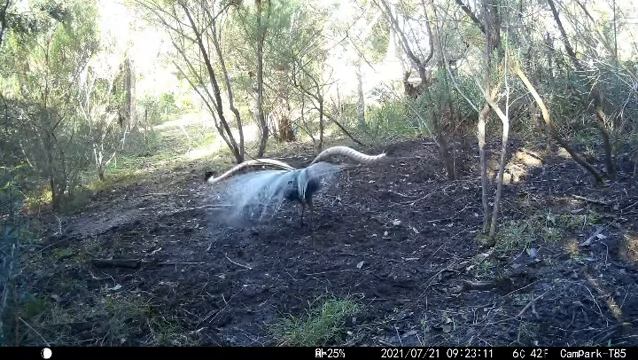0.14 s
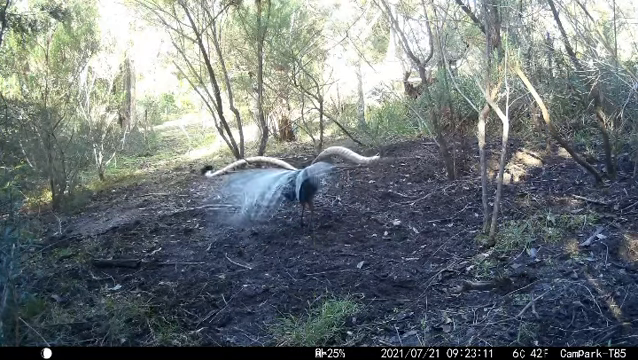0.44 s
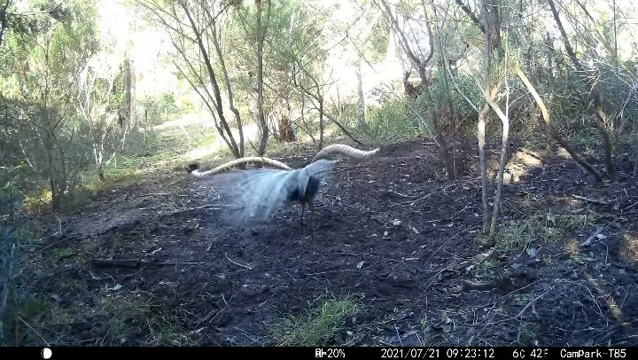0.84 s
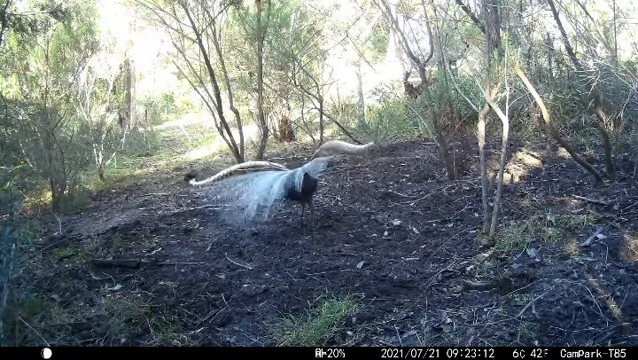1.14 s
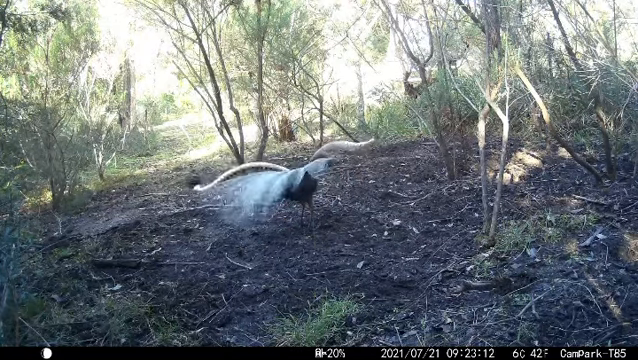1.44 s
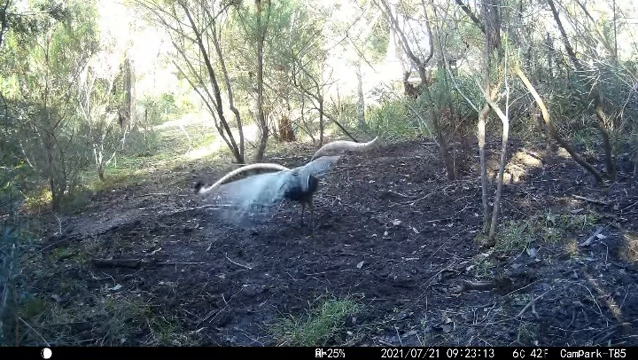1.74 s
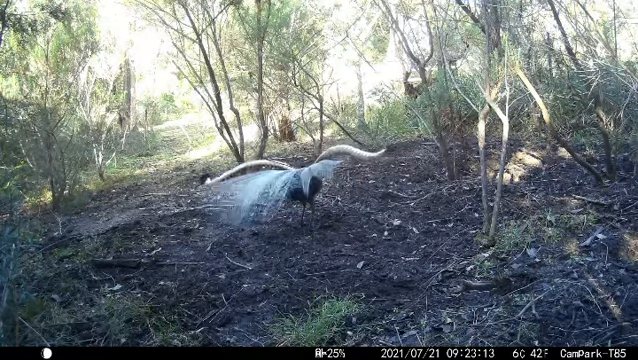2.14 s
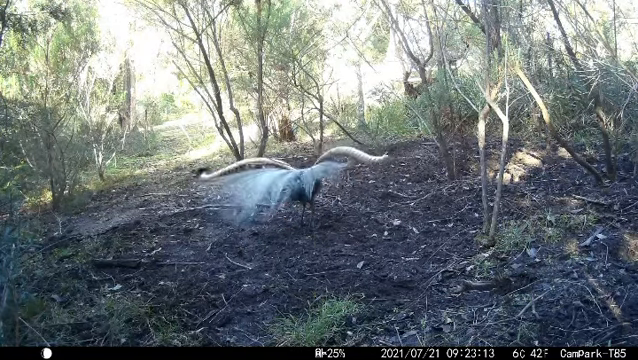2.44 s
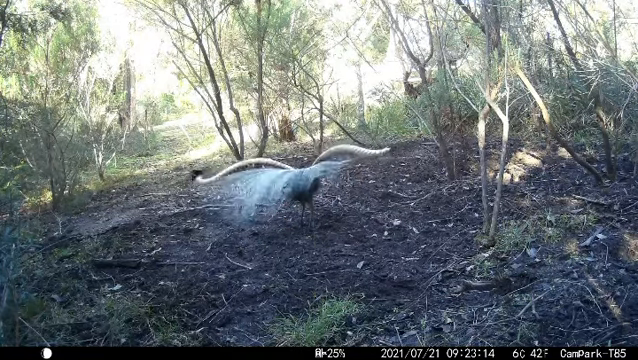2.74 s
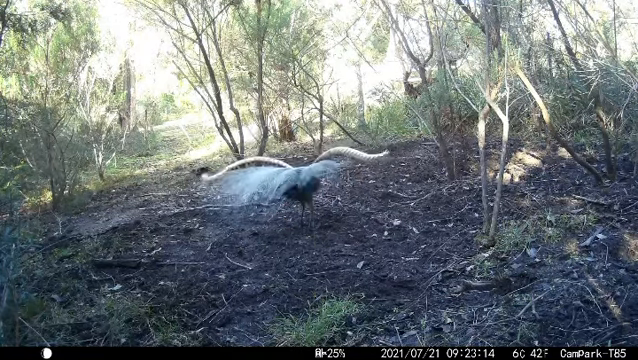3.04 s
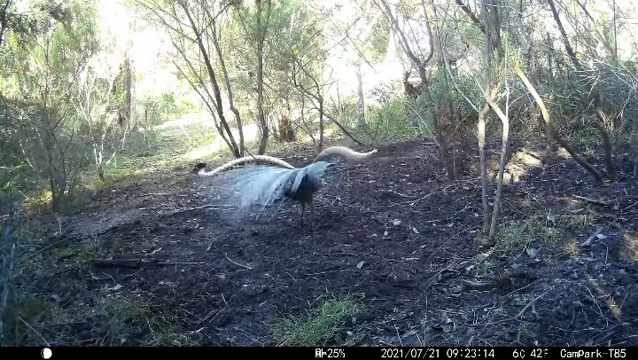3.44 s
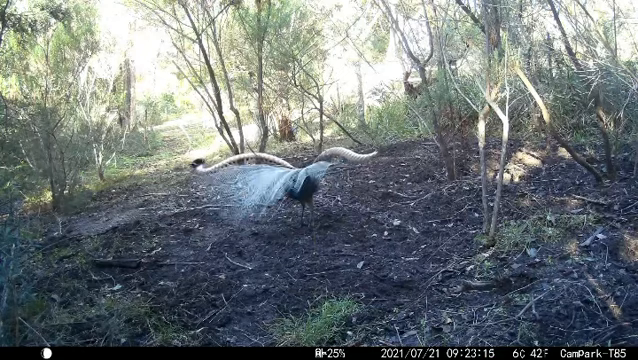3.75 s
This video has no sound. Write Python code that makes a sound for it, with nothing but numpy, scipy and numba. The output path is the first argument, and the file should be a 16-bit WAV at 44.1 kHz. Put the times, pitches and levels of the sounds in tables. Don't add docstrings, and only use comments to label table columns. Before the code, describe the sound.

Bird song on a forest floor: short breathy rasps over faint feather rustle, two harsh descending squawks, a pause, then three rich bending whistles, lightly echoed by trees, through a slightly dull, hissy small microphone.

```python
import sys
import numpy as np
from scipy import signal
from scipy.fft import rfft, irfft, next_fast_len
from scipy.io import wavfile
from scipy.ndimage import uniform_filter1d, map_coordinates
from numba import njit

SR = 44100
rng = np.random.default_rng(int(sys.argv[2]) if len(sys.argv) > 2 else 0)


def master_out(mix):
    frames = np.transpose(np.atleast_2d(mix))
    ceiling = np.clip(frames, -1, 1)
    pcm = np.round(ceiling * 32767).astype(np.int16)
    wavfile.write(sys.argv[1], SR, pcm)


def field_ratio(decibels):
    return 10 ** (np.asarray(decibels, dtype=float) / 20)


N = 171990
BAND_HZ = 14770

# centre_hz, width_hz, gain_db
OPEN_BILL = [(1662, 674, -7.5), (2810, 424, -3.5), (4210, 1840, -4), (5170, 1115, -0.5), (6867, 460, -5),
             (7600, 350, -2), (9670, 1900, -11.5), (12960, 900, -16)]
BREATH_PIPE = OPEN_BILL[:2] + [(3720, 1820, -8.0)] + OPEN_BILL[3:]
# centre_hz, width_hz, gain_db
SHUT_BILL = [(1720, 360, 6.5), (2274, 231, 3), (2620, 390, -8.5), (5100, 390, -12.5), (7130, 960, -4.5),
             (12755, 467, -7.5)]
# centre_hz, width_hz, depth_db
POUCHES = [(3687, 1720, -13), (6030, 1000, -1), (8550, 790, -15)]


def unit(x):
    return x / np.sqrt(np.mean(x ** 2) + 1e-20)


def along(points, hz):
    f, v = np.transpose(points)
    return np.interp(np.log(hz + 1), np.log(f + 1), v)


def curves(rows):
    s, *cols = np.transpose(sorted(rows))
    return [np.interp(np.arange(N) / SR, s, c) for c in cols]


def wobble(rate_hz):
    knots = rng.standard_normal(int(N * rate_hz / SR) + 4)
    return map_coordinates(knots, [np.arange(N) * rate_hz / SR])


def filtered(x, response):
    m = next_fast_len(N + SR // 2)
    return irfft(rfft(x, m) * response(np.fft.rfftfreq(m, 1 / SR)), m)[:N]


def resonances(f, peaks):
    total = 0
    for k, (centre, width, db) in enumerate(peaks):
        total = total + (-1) ** k * field_ratio(db) * 1j * f * width / (centre ** 2 - f * f + 1j * f * width)
    return total


def notches(f, dips):
    total = 1
    for centre, width, db in dips:
        detune = centre ** 2 - f * f
        total = total * (detune + 1j * f * width * field_ratio(db)) / (detune + 1j * f * width)
    return total


def tube(x, peaks, cut_hz, dips=()):
    smear_s = .0038

    def response(f):
        low_cut = (1j * f / (cut_hz + 1j * f)) ** 4
        lag = np.exp(-1j * np.pi * smear_s * f * f / BAND_HZ)
        return low_cut * lag * resonances(f, peaks) * notches(f, dips)

    y = filtered(x, response)
    return y / np.sqrt(np.abs(uniform_filter1d(y * y, size=1200)) + 1e-12)


def puffs(phase, r):
    return (1 - r * r) / (1 - 2 * r * np.cos(phase) + r * r) - 1


def breath(slaps_hz):
    phase = 2 * np.pi * np.cumsum(slaps_hz * (1 + 0.39 * wobble(400))) / SR
    gate = (1 + puffs(phase, 0.079)) * field_ratio(0.77 * wobble(150))
    return gate * signal.lfilter([1], [1, -0.23], rng.standard_normal(N))


def recorder_noise():
    # freq_hz, density_db
    spectrum = [(18, -59), (30, -13.5), (102, -7), (315, -16), (417, -20.5), (499, -20.5), (1660, -32.5),
                (8100, -33.5), (13500, -36.5)]
    noise = filtered(rng.standard_normal(N), lambda hz: field_ratio(along(spectrum, hz)))
    return unit(noise) * field_ratio(-56 + 0.17 * wobble(10.46))


def rasps():
    # start_s, end_s, level_db, rise_db
    calls = [
        (-.03, 0.116, -26, -2.5),
        (0.429, 0.505, -25.5, 5.5),
        (0.555, 0.556, -44, 10),
        (0.823, 0.922, -29, 15.5),
        (1.097, 1.168, -29.5, 9.5),
        (1.693, 1.765, -19.5, 15.5),
    ]
    flutters = [1.5, 3.2, 0, 3.6, 1.2, 2]
    # centre_hz, width_hz, depth_db
    throat_dips = [(710, 1130, -3.5), (3500, 1160, -3.5), (9210, 1600, -3.5)]
    slap_hz, flutter_hz, cut_hz, onset_s, release_s = 900, 52, 300, 0.032, 0.021
    t = np.arange(N) / SR
    shape = np.zeros(N)
    for (start, end, db, rise_db), flutter_db in zip(calls, flutters):
        swell_db = -rise_db * np.clip((end - .02 - t) / (end - start), 0, 1)
        throat_db = flutter_db * (np.cos(2 * np.pi * flutter_hz * (t - end + 0.0077)) - 1)
        edge_db = -20 * (np.maximum(start - t, 0) / onset_s + np.maximum(t - end, 0) / release_s)
        shape += field_ratio(db + swell_db + throat_db + np.maximum(edge_db, -200))
    return shape * tube(breath(slap_hz), BREATH_PIPE, cut_hz, throat_dips)


def plumes():
    # time_s, level_db
    rustle = [(0, -47), (.2, -55.5), (.31, -51), (.4, -51), (.53, -63), (.64, -52.5), (.8, -62), (1.1, -98)]
    level_db, = curves(rustle)
    grains = rng.standard_normal(N) * field_ratio(1.4 * wobble(900) + 5.5 * wobble(54.4))
    return field_ratio(level_db) * tube(grains, BREATH_PIPE, 600)


def trees(x):
    # freq_hz, t60_s
    decay = [(800, 0.29), (5000, 0.23), (12000, 0.21)]
    level_db, delay_s = -20.5, 0.014
    hz, t, z = signal.stft(rng.standard_normal(SR // 2), SR, nperseg=256)
    tail = signal.istft(z * field_ratio(-60 * t / along(decay, hz)[:, None]), SR, nperseg=256)[1]
    late = np.pad(x, (int(delay_s * SR), 0))
    return field_ratio(level_db) * signal.fftconvolve(late, tail / np.linalg.norm(tail))[:N]


def twig_ticks():
    # time_s, peak_db
    ticks = [
        (0.364, -45),
        (0.39, -27),
    ]
    # centre_hz, width_hz, gain_db
    wood = [(2570, 500, 10.5), (5270, 3300, -7)]
    t60_s, attack_s = 0.039, 0.00077
    t = np.arange(260) / SR
    blows = np.zeros(N)
    for s, db in ticks:
        decay = field_ratio(db - 5.5 - 60 * t / t60_s)
        blows[round(s * SR):][:260] += decay * np.minimum(t / attack_s, 1) * rng.standard_normal(260)
    return 2 * filtered(blows, lambda f: resonances(f, wood))


def far_bird():
    # centre_s, half_length_s, pitch_hz, level_db
    murmurs = [
        (1.86, 0.051, 1193, -61),
        (3.875, 0.045, 1260, -54.5),
    ]
    t = np.arange(N) / SR
    out = np.zeros(N)
    for s, half_s, hz, db in murmurs:
        swell = field_ratio(db + 2.9 * wobble(62)) * np.exp(-((t - s) / half_s) ** 2)
        out += swell * np.sin(2 * np.pi * hz * t + 2.0 * wobble(120))
    return out


@njit
def slip(gap_hz, lock_hz, rate):
    out = np.zeros(len(gap_hz))
    for i in range(1, len(out)):
        out[i] = out[i - 1] + 2 * np.pi * (gap_hz[i] - lock_hz * np.sin(out[i - 1])) / rate
    return out


def valve(phase, pull, low, coupling):
    low_bright, high_bright, high_db = 0.88, 0.62, 9.5
    lower = puffs(phase, low_bright)
    upper = puffs(2 * phase + pull, high_bright)
    overtones = lower - 2 * low_bright * np.cos(phase)
    return low * overtones + (1 - low) * (field_ratio(high_db) + coupling * lower) * upper


def frayed_flow(phase, pull, low, coupling):
    # time_s, jitter_rad
    fray = [(1.95, .1), (2.01, .03), (2.09, .04), (2.33, .1), (2.38, .03), (2.46, .05), (2.77, .15),
            (3.19, .13), (3.205, .03), (3.25, .035), (3.265, .13), (3.53, .12), (3.56, .07), (3.61, .04),
            (3.63, .09), (3.705, .08), (3.72, .012), (3.76, .02), (3.78, .13)]
    fray_hz = 5300
    clean = valve(phase, pull, low, coupling)
    ragged = valve(phase + curves(fray)[0] * wobble(1600), pull, low, coupling)
    return clean + filtered(ragged - clean, lambda f: 1 - 1 / (1 + (f / fray_hz) ** 10))


def stretched_throat(flow, cut_hz):
    long_pipe = SHUT_BILL[:3] + [(4840, 430, -7.5), (7940, 340, -14), (11240, 870, -9.5),
                 (13235, 1020, -8.5)]
    return tube(flow, long_pipe, cut_hz, POUCHES)


def whistle_throat(flow):
    # time_s, stretch_0_1
    neck = [(2.76, 0.33), (3.05, 0.05), (3.2, 0.2), (3.3, 0.18), (3.54, 0.25), (3.585, 0.92), (3.69, 0.79),
            (3.72, 0.48), (3.79, 0.34)]
    cut_hz = 374
    stretch = np.clip(curves(neck)[0], 0, 1)
    relaxed = tube(flow, SHUT_BILL, cut_hz, POUCHES)
    return (1 - stretch) * relaxed + stretch * stretched_throat(flow, cut_hz)


def song():
    # time_s, pitch_hz, level_db
    squawk_a = [(1.944, 1229, -41), (1.965, 1211, -33), (1.99, 1113, -22.5), (2.035, 945.6, -19),
                (2.05, 853, -19), (2.08, 896.4, -22), (2.105, 853, -22.5), (2.122, 810, -35.5),
                (2.14, 760, -45)]
    squawk_b = [(2.285, 1287, -70), (2.298, 1279, -38), (2.33, 1249, -23), (2.366, 1165, -21),
                (2.401, 1081, -19.5)]
    quaver_b = [(2.407, 959, -18.5), (2.426, 937, -16.5), (2.44, 962.4, -17.5), (2.454, 941.5, -20),
                (2.474, 855, -20.5), (2.488, 820, -37), (2.502, 805, -68)]
    fall = [(2.763, 1262, -98), (2.771, 1267, -45.5), (2.791, 1126, -47.5), (2.815, 1008, -32),
            (2.841, 909, -25.5), (2.863, 827, -29.5), (2.875, 692, -40.5), (2.889, 581, -45.5),
            (2.902, 479, -76)]
    dip_a = [(2.987, 1037, -49), (3.005, 1052, -46.5), (3.027, 1095, -35.5), (3.037, 907, -24.5),
             (3.046, 723, -29.5), (3.066, 683, -25), (3.086, 876, -19.5), (3.132, 756.6, -21.5),
             (3.172, 815.6, -25)]
    arch_a = [(3.193, 867, -22), (3.215, 926, -20.5), (3.236, 935.4, -20), (3.247, 964, -23.5),
              (3.268, 927, -19), (3.297, 860.6, -17), (3.32, 767, -25), (3.338, 608.4, -38),
              (3.351, 569, -101)]
    dip_b = [(3.439, 995, -59), (3.457, 1107, -34), (3.472, 900, -24), (3.489, 630, -30.5),
             (3.5, 618, -26.5), (3.519, 704, -17.5), (3.535, 917, -18.5), (3.557, 856, -12.5),
             (3.575, 841, -14.5)]
    arch_b = [(3.613, 955, -9), (3.661, 1119, -17), (3.704, 1108, -10), (3.714, 1105, -13.5),
              (3.746, 1094, -15.5), (3.76, 1069, -19.5), (3.787, 900, -10.5), (3.8, 850, -34),
              (3.803, 740, -62)]
    # time_s, gap_from_octave_hz, low_share_0_1, roughness_0_1
    squawk_pull = [(1.95, -700, .2, .95), (1.975, -620, .3, .5), (1.99, -540, .25, .2),
                   (2.012, -314, .2, .05), (2.03, -235, .2, .04), (2.038, -160, .3, .03),
                   (2.05, 0, .7, .015), (2.093, 0, .7, .03), (2.105, 0, .6, .7), (2.3, -800, .2, .95),
                   (2.335, -680, .25, .3), (2.365, -480, .25, .1), (2.39, -270, .25, .04),
                   (2.401, -230, .3, .04), (2.408, 0, .3, .03), (2.413, 0, .7, .02), (2.445, 0, .7, .03),
                   (2.47, 0, .6, .45)]
    fall_pull = [(2.78, 0, .6, .02), (2.79, -230, .6, .04), (2.82, -110, .6, .04), (2.835, 0, .6, .04),
                 (2.845, -120, .6, .06), (2.87, -150, .6, .25)]
    whistle_a_pull = [(3.015, 0, .6, .1), (3.03, -200, .6, .2), (3.045, 0, .6, .08), (3.065, 0, .6, .08),
                      (3.09, -290, .6, .12), (3.125, -210, .3, .15), (3.155, -110, .6, .15),
                      (3.195, -80, .6, .1), (3.205, 0, .6, .02), (3.25, 0, .6, .02), (3.275, 260, .9, .08),
                      (3.33, 300, .6, .3)]
    whistle_b_pull = [(3.45, -250, .6, .3), (3.48, 0, .6, .1), (3.545, 0, .6, .01), (3.612, 0, .6, .01),
                      (3.622, -115, .6, .02), (3.655, -160, .6, .03), (3.672, -100, .6, .03),
                      (3.707, -90, .6, .03), (3.714, 0, .6, .01), (3.755, 0, .6, .01),
                      (3.775, -110, .6, .05), (3.795, -150, .6, .15)]
    lock_hz, lead_rad, jitter, open_cut_hz = 70, 1.2, .004, 910
    t = np.arange(N) / SR
    whistling = t > 2.65

    notes = [squawk_a, squawk_b + quaver_b, fall, dip_a + arch_a, dip_b + arch_b]
    low_hz, level_db = curves(sum(notes, []))
    gap_hz, low, rough = curves(squawk_pull + fall_pull + whistle_a_pull + whistle_b_pull)
    low_hz, gap_hz = uniform_filter1d([low_hz, gap_hz], size=300)
    unsteady = jitter * (wobble(60) + 4 * rough * wobble(300))
    phase = 2 * np.pi * np.cumsum(low_hz * (1 + unsteady)) / SR
    pull = slip(np.sign(gap_hz) * np.hypot(gap_hz, lock_hz), lock_hz, SR) + lead_rad
    flow = frayed_flow(phase, pull, low, np.where(whistling, .6, .25))
    tone = np.where(whistling, whistle_throat(flow), tube(flow, OPEN_BILL, open_cut_hz))

    air = breath(low_hz)
    whistle_hiss = field_ratio(-15) * tube(air, BREATH_PIPE, open_cut_hz, POUCHES)
    squawk_hiss = field_ratio(2) * tube(air, BREATH_PIPE, open_cut_hz)
    hiss = np.where(whistling, whistle_hiss, squawk_hiss)

    chest_db = np.minimum(level_db - 3, np.where(whistling, -40.5, -54.5))
    chest = field_ratio(chest_db + 1.9 * wobble(48)) * np.sqrt(2) * np.sin(phase)
    sounding = sum(np.clip(np.minimum(t - n[0][0], n[-1][0] - t) / .01, 0, 1) for n in notes)
    voiced = np.sqrt(1 - rough) * tone + np.sqrt(rough) * hiss
    return sounding * (field_ratio(level_db) * voiced + chest)


def scene():
    bird = rasps() + plumes() + twig_ticks() + song()
    return (bird + trees(bird) + recorder_noise() + far_bird())[None]


def low_pass(x):
    return signal.sosfilt(signal.butter(12, 14770, fs=SR, output="sos"), x)


def record(dry):
    top_hz = 14900
    mix = filtered(dry[0], lambda hz: (hz < BAND_HZ) / (1 + (hz / top_hz) ** 60))
    return low_pass(mix[None])


dry = scene()
out = record(dry)
master_out(out)
```